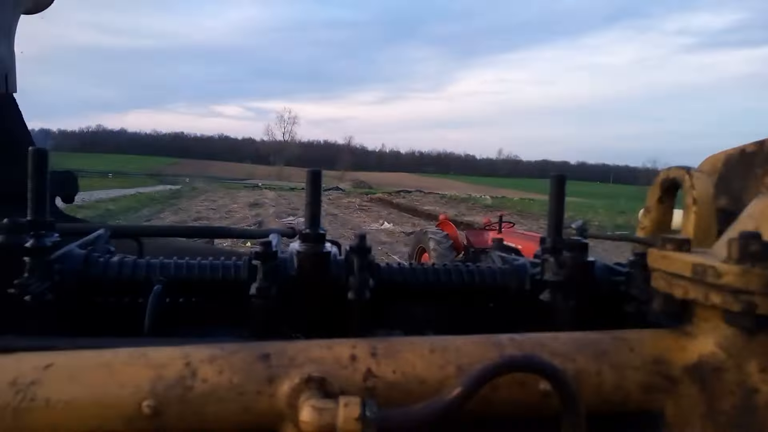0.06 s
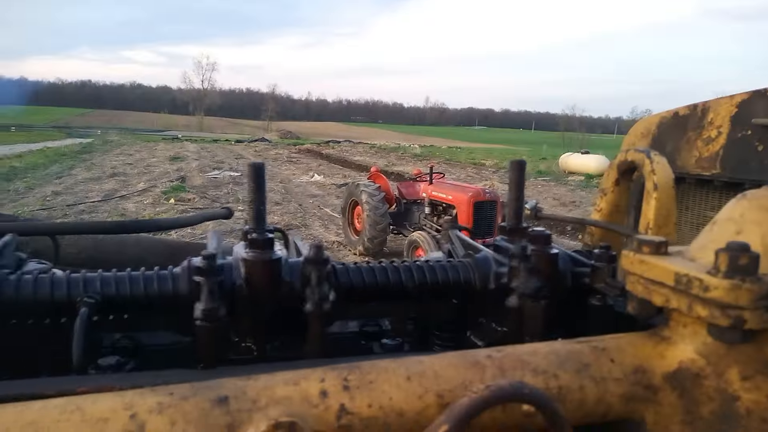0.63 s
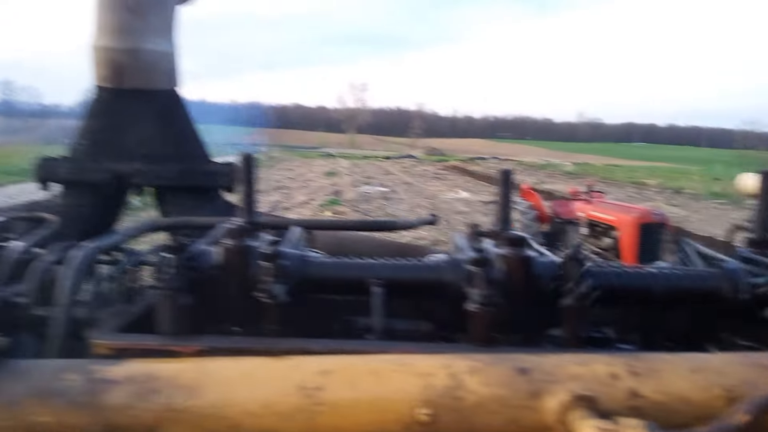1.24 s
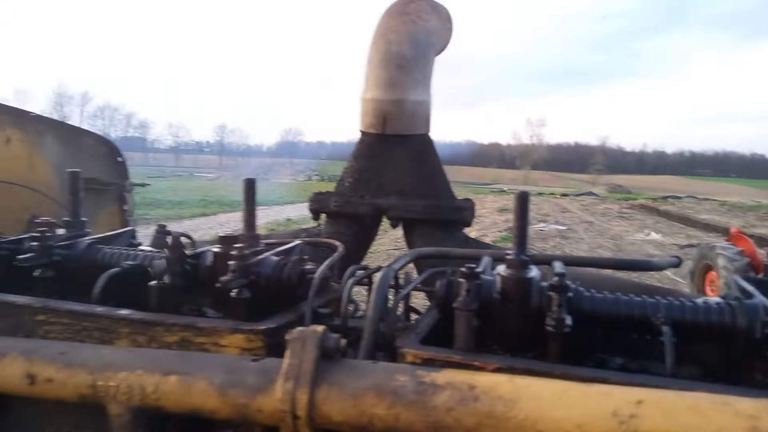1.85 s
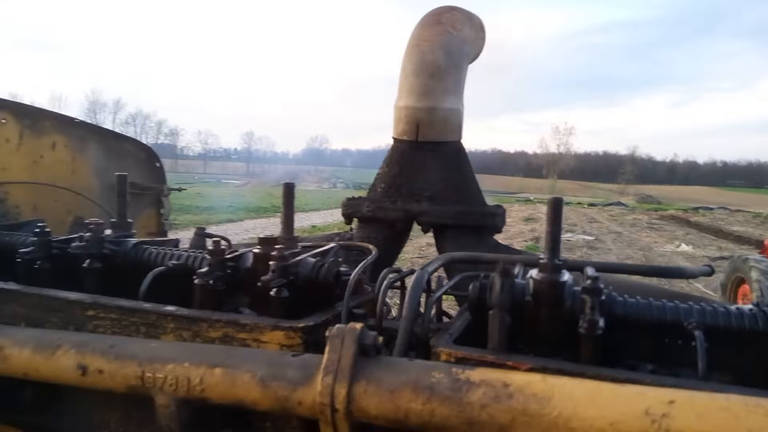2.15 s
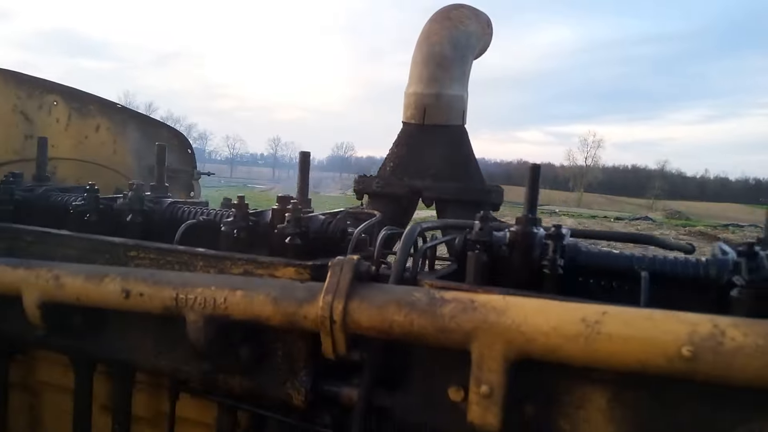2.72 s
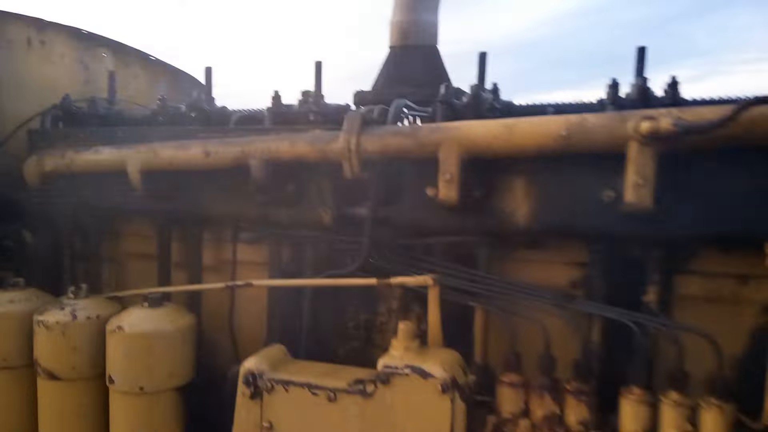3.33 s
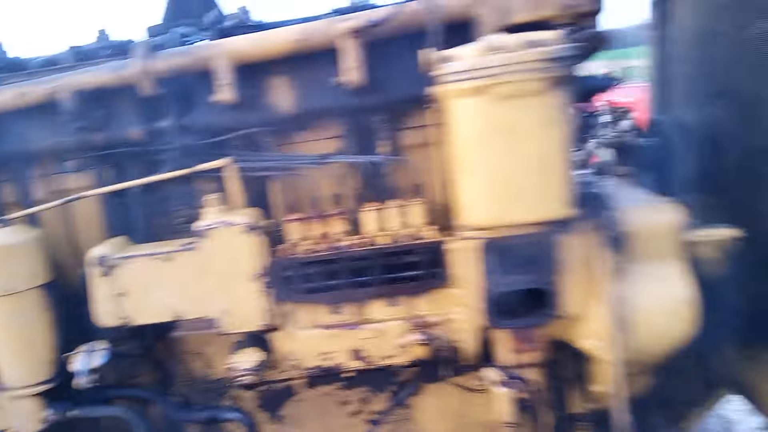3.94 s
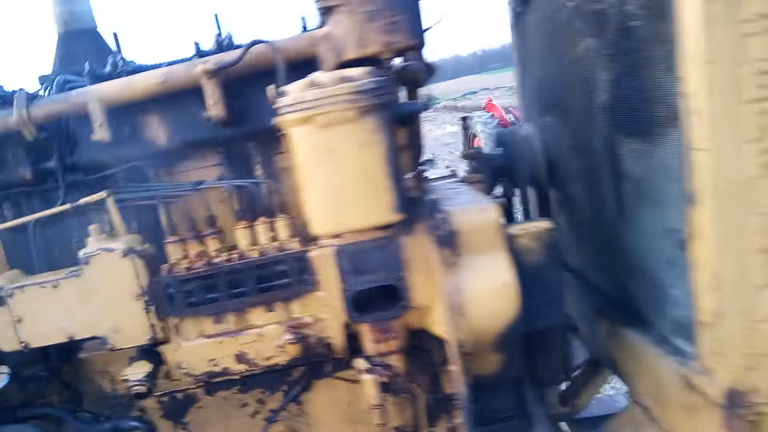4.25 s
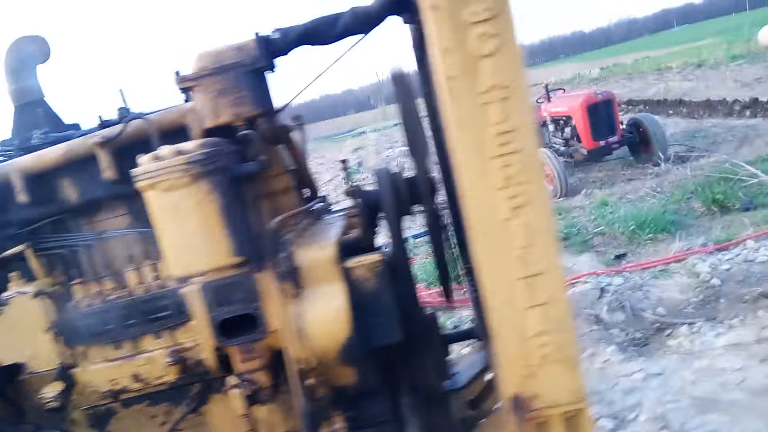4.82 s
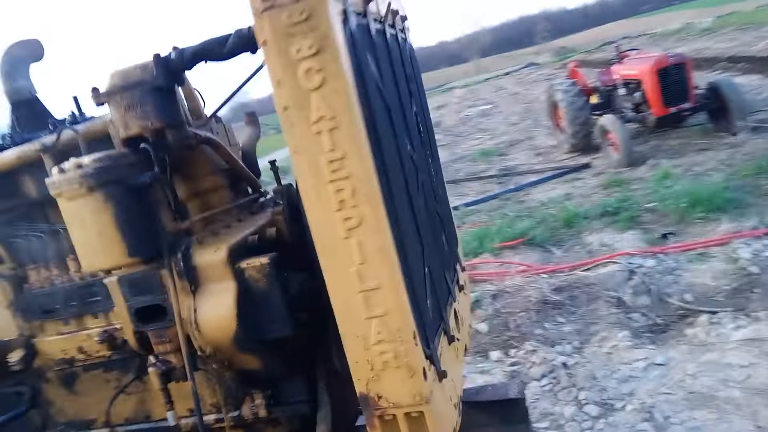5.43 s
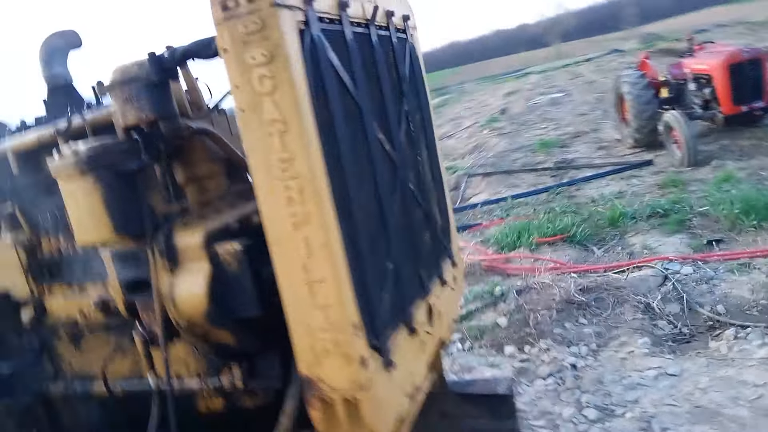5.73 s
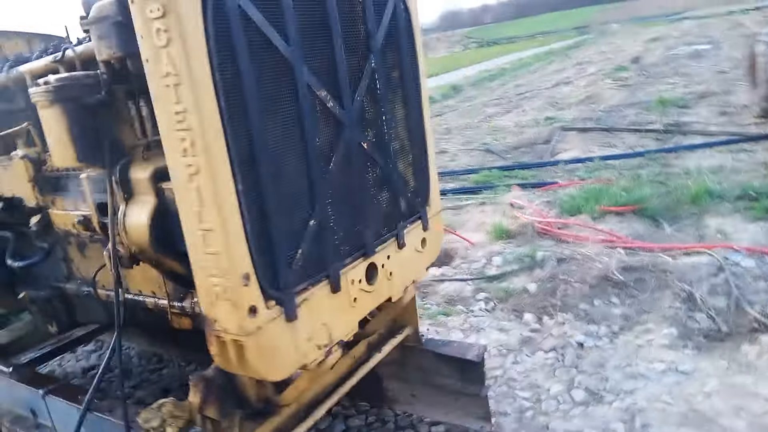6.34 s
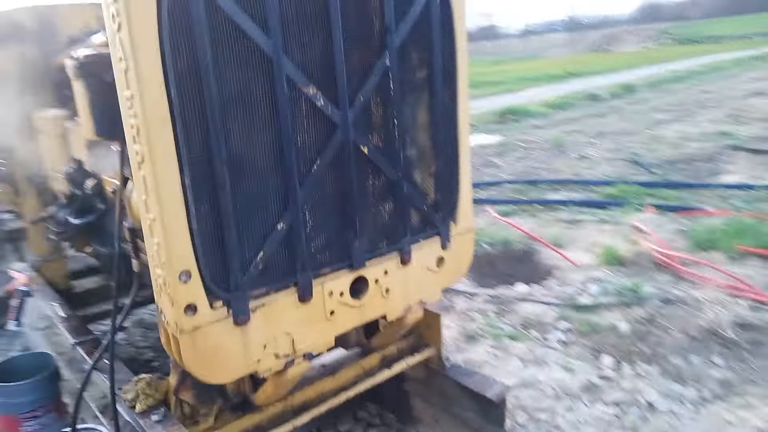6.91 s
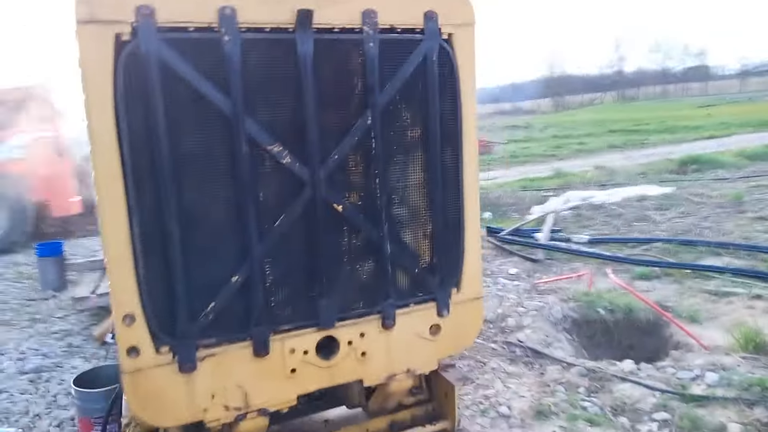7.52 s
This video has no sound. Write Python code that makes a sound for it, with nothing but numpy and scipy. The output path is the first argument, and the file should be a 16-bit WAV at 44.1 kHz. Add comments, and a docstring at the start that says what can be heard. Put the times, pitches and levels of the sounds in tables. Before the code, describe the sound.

A big old diesel engine idles outdoors for nearly eight seconds, the microphone starting close to its cylinder head. Sharp, slightly whistling chuffs of gas come five times a second, with two softer puffs between each. Underneath run rapid knocks, hollow metal ringing, whirring gears, clinking valves and low intake gulps, the last two clearest in the first two seconds. Longer, harsh barks break in around 0.2, 1, 1.8, 2.2 and 4.8 seconds, with weaker ones near 6.6 and 7.4. Scattered metallic clanks and hollow clonks punctuate the rhythm. Short gusts buffet the microphone just after 2 seconds, near 3, and between 5.5 and 6. From about 3 to 4.5 seconds the microphone passes a lightly rattling fuel pump. From 5 seconds it reaches the radiator: the engine keeps its pace but sounds quieter, the chuffs gain a thin high hiss, and a faint, low fan rush comes up.

```python
"""Sharp chuffs of gas, five a second, from a big old diesel outdoors, the microphone close to its head.
Each turn brings one sharp chuff, two softer ones, a low intake gulp and six knocks; now and then comes
a longer, harsh bark. Gears whirr, valve gear clinks and a few gusts buffet the microphone. We walk past
the rattling injection pump to the radiator, where the engine is quieter and the fan's rush comes up."""
import sys
import numpy as np
from scipy import signal
from scipy.fft import rfft, irfft, next_fast_len
from scipy.io import wavfile
from scipy.ndimage import uniform_filter1d, map_coordinates

SR = 44100
rng = np.random.default_rng(int(sys.argv[2]) if len(sys.argv) > 2 else 0)


def digitize_waveform(pressure):
    """Quantize a signal to 16-bit integers and store it at the path in sys.argv[1].

    Rows of a 2-D input are taken as channels; values are limited to [-1, 1].
    """
    field = np.atleast_2d(pressure).T
    bounded = np.clip(field, -1, 1)
    quanta = np.round(bounded * 32767).astype(np.int16)
    wavfile.write(sys.argv[1], SR, quanta)


N = 338247
TIME = np.arange(N) / SR


def amp(db):
    """Decibels to gain."""
    return 10 ** (np.asarray(db) / 20)


def unit(x):
    """Scale to rms 1."""
    return x / np.sqrt(np.mean(x ** 2) + 1e-20)


def loudness(x, size):
    """Running rms over size samples."""
    return np.sqrt(abs(uniform_filter1d(x ** 2, size)) + 1e-14)


def along(table, times, column=1):
    """One column of a (time [s], ...) table at these times."""
    columns = np.transpose(table)
    return np.interp(times, columns[0], columns[column])


def between(start, end):
    """The samples from start to end, in seconds."""
    return slice(*np.searchsorted(TIME, [start, end]))


def scatter(times, spread_db):
    """A random level offset for each of these times."""
    return spread_db * rng.standard_normal(len(times))


def wobble(rate):
    """A smooth random curve with rate knots a second."""
    knots = rng.standard_normal(int(N * rate / SR) + 4)
    steps = np.arange(0, len(knots) - 1, 1 / 8)
    return np.interp(TIME * rate, steps, map_coordinates(knots, [steps]))


def turbulence(rough_db, rate):
    """White noise that sputters in brief random bursts."""
    return unit(rng.standard_normal(N) * amp(rough_db * wobble(rate)))


def filtered(x, response):
    """Filter x by a gain that depends on frequency."""
    size = next_fast_len(len(x) + 8192)
    return irfft(rfft(x, size) * response(np.fft.rfftfreq(size, 1 / SR)), size)[:len(x)]


def colour(x, points):
    """Shape x by (frequency [Hz], level [dB]) points on a log axis; rms 1."""
    freqs, db = np.transpose(points)
    return unit(filtered(x, lambda hz: amp(np.interp(np.log(hz + 1), np.log(freqs), db))))


def resonate(x, modes):
    """Pass x through (frequency [Hz], width [Hz], level [dB]) resonances; rms 1."""
    def response(f):
        return sum(amp(db) * 1j * f * width / (hz * hz - f * f + 1j * f * width)
                   for hz, width, db in modes)
    return unit(filtered(x, response))


def swell(t, rise, fall):
    """A rounded peak at t = 0 with exponential flanks; rise and fall in seconds."""
    return np.exp(1 - np.sqrt(1 + (t / np.where(t < 0, rise, fall)) ** 2))


def puffs(times, levels_db, rise, fall):
    """The envelope of a row of puffs."""
    out = np.zeros(N)
    for s, db in zip(times, levels_db):
        near = between(s - .1, s + .15)
        out[near] += amp(db) * swell(TIME[near] - s, rise, fall)
    return out


# The engine's slightly drifting idle: (time [s], speed [turns/s])
IDLE_SPEED = [(0, 4.942), (1.5, 4.991), (2.7, 5.093), (3.7, 5.077), (4.8, 4.982), (5.5, 4.996),
              (6.3, 4.888), (7.2, 4.866), (7.67, 4.998)]
FIRST_CHUFF_S = .047

def moments(share):
    """The time at which each turn has gone through this share of its round."""
    clock = np.arange(0, N / SR + .5, .001)
    turns = np.cumsum(along(IDLE_SPEED, clock)) * clock[1]
    turns -= np.interp(FIRST_CHUFF_S, clock, turns)
    return np.interp(np.arange(np.interp(N / SR, clock, turns)) + share, turns, clock)


def castings(x, echo, spread_s):
    """Short reflections between the castings comb the sound, differently at each place on the walk."""
    places, spacing = np.linspace(0, N / SR, num=20, retstep=True)
    out = np.zeros(N)
    for place in places:
        near = np.flatnonzero(abs(TIME - place) < spacing)
        delays, gains = rng.uniform(.0004, spread_s, size=6), rng.normal(0, echo, size=6)
        echoes = sum(gain * x[near - int(delay * SR)] for delay, gain in zip(delays, gains))
        crossfade = np.sqrt(1 - abs(TIME[near] - place) / spacing)
        out[near] += unit(x[near] + echoes) * crossfade
    return unit(out)


# Air through the radiator: (frequency [Hz], level [dB])
FAN_SPECTRUM = [(20, -18), (55, -8), (110, -5.5), (190, 3), (280, 1.5), (450, -14), (1500, -44)]
# The fan comes up as the microphone nears it: (time [s], level [dB])
FAN_APPROACH = [(3, -64.5), (5, -55.5), (7, -55.5)]

def fan():
    """The cooling fan pushes a low, uneven rush of air through the radiator."""
    level_db = along(FAN_APPROACH, TIME) + 1.75 * wobble(9)
    return amp(level_db) * colour(rng.standard_normal(N), FAN_SPECTRUM)


# Wind right on the microphone: (time [s], length [s], buffet [dB], rumble [dB])
MIC_GUSTS = [(0.77, 0.042, -36.5, -45), (2.069, 0.096, -25.5, -72), (2.14, 0.11, -44, -57),
             (2.234, 0.089, -29, -48), (2.985, 0.13, -36, -61), (5.455, 0.076, -39.5, -54),
             (5.582, 0.14, -40.5, -44.5), (5.74, 0.073, -41, -54), (5.826, 0.053, -39, -37.5),
             (5.96, 0.18, -42.5, -44.5)]
# Its buffet and its deep rumble: (frequency [Hz], level [dB])
BUFFET_SPECTRUM = [(20, -36), (60, -3), (140, 5.5), (220, -2), (350, -8), (800, -74)]
RUMBLE_SPECTRUM = [(15, -6), (40, 0), (60, 7), (85, 30), (160, -47)]

def wind():
    """Brief gusts buffet the microphone, some with a deep rumble."""
    buffet = colour(rng.standard_normal(N), BUFFET_SPECTRUM)
    rumble = colour(rng.standard_normal(N), RUMBLE_SPECTRUM)
    buffet /= loudness(buffet, size=2200)
    rumble /= loudness(rumble, size=4400)
    return sum((amp(db) * buffet + amp(deep_db) * rumble) * np.exp(-(2 * (TIME - s) / length) ** 2)
               for s, length, db, deep_db in MIC_GUSTS)


# The pump's housing: (frequency [Hz], width [Hz], level [dB])
PUMP_MODES = [(916, 41, 1.5), (960, 65, 6.5), (1060, 110, -13)]

def injection_pump():
    """The pump rattles three times a turn, loudest as the microphone passes it halfway along."""
    passing_db = np.interp(TIME, [0, 2.3, 3.2, 4.2, 4.8, 7.6], [-82, -53, -47.5, -45.5, -63, -53.5])
    plungers = sum(puffs(moments(k / 3), scatter(moments(0), spread_db=3), rise=.006, fall=.012)
                   for k in range(3))
    rattle = turbulence(rough_db=3.5, rate=220) * plungers
    rattle = colour(rattle, [(400, -18), (800, -4), (1100, 2), (2000, -26)])
    return amp(passing_db) * resonate(rattle, PUMP_MODES)


# Relative levels from head to radiator: (time [s], knocks [dB], hollow ring [dB], gears [dB], air [dB])
MACHINERY_WALK = [(0, -45.5, -42.5, -39.5, -55), (.9, -43.5, -42, -38.5, -56), (2.4, -44, -48, -37, -56),
                  (3.5, -45.5, -42, -39.5, -61), (4.5, -49, -48.5, -43, -67), (5.8, -51, -58.5, -48, -70),
                  (7.2, -53, -55, -48, -85), (7.67, -55, -44, -49, -85)]
# The gears' whirr and the hiss of air: (frequency [Hz], level [dB])
GEAR_SPECTRUM = [(500, -20.5), (1000, -12), (1180, -8.5), (1340, 4), (1480, 3.5), (1630, -4.5), (1880, -9),
                 (2050, -17), (2180, -17), (2450, -19), (5000, -23.5), (8000, -46.5)]
AIR_SPECTRUM = [(2000, -29), (6000, 10.5), (8000, -2.5), (11000, 0), (13700, -5), (15000, 9), (15800, 4)]

def gears():
    """Gear teeth whirr under an uneven load, and twelve small ticks a turn ride on a hiss of air."""
    turns = moments(0)
    ticks = np.zeros(N)
    for k in range(12):
        times = moments(.03 + k / 12) + rng.normal(0, .002, len(turns))
        ticks += puffs(times, scatter(turns, spread_db=3), rise=.0005, fall=.002)
    load = amp(1.6 * wobble(22))
    teeth = turbulence(rough_db=1.5, rate=160) * load * (1 + ticks)
    whirr = castings(colour(teeth, GEAR_SPECTRUM), echo=.37, spread_s=.012)
    air = colour(rng.standard_normal(N) * (.2 + ticks), AIR_SPECTRUM)
    gear_db = along(MACHINERY_WALK, TIME, column=3) - .5
    air_db = along(MACHINERY_WALK, TIME, column=4) + .5
    return amp(gear_db) * whirr + amp(air_db) * air


# The shaken engine block: (frequency [Hz], level [dB])
BLOCK_SPECTRUM = [(35, -47), (70, -4.5), (120, -4), (240, -4.5), (350, 1), (440, -0.5), (520, -3),
                  (690, -2.5), (900, -4.5), (1100, -3.5), (1600, -15), (2400, -27), (5000, -82)]

def knocks():
    """Six knocks a turn shake the block, over a rough, continuous shudder."""
    turns = moments(0)
    blows = sum(puffs(moments(.055 + k / 6), scatter(turns, spread_db=2), rise=.001, fall=.006)
                for k in range(6))
    shaking = turbulence(rough_db=2.26, rate=250) * amp(1.83 * wobble(14)) * (blows + 1.55)
    return amp(along(MACHINERY_WALK, TIME) + 4) * colour(shaking, BLOCK_SPECTRUM)


# Blows on a hollow housing: (place in the turn [turns], level [dB])
HOUSING_BLOWS = [(.05, 1), (.21, 1), (.32, -0.5), (.39, -8.5), (.72, 2), (.88, 0.5)]
# Its resonances: (frequency [Hz], width [Hz], level [dB])
HOUSING_MODES = [(633, 27, -9.5), (685.6, 38, 8), (719, 29, 8)]

def hollow_ring():
    """The knocks make a hollow housing ring in uneven surges."""
    turns = moments(0)
    blows = sum(puffs(moments(share), db + scatter(turns, spread_db=5.5), rise=.0045, fall=.011)
                for share, db in HOUSING_BLOWS)
    drive = colour(rng.standard_normal(N), [(300, -32), (600, 1), (800, -1.5), (1400, -32)])
    ring = resonate(drive, HOUSING_MODES) * (blows + .24)  # it hums on between knocks
    return amp(along(MACHINERY_WALK, TIME, column=2) - 1.5) * unit(ring)


# Louder hollow clonks: (time [s], pitch [Hz], relative level [dB])
HEAVY_BLOWS = [(.305, 664, -37.5), (.626, 724, -37.5), (.9, 673, -34), (1.705, 670, -38.5),
               (4.433, 337, -40), (4.656, 323, -40.5), (5.037, 340, -40)]

def clonks():
    """Now and then a heavier blow rings a hollow part of the engine, with a rough, wavering tone."""
    out = np.zeros(N)
    waver = .8 * wobble(110)
    for s, hz, db in HEAVY_BLOWS:
        near = between(s - .03, s + .15)
        t = TIME[near] - s
        tone = np.sin(2 * np.pi * hz * t + waver[near])
        out[near] += amp(db + 5.5) * swell(t - .003, rise=.006, fall=.014) * tone
    return out


# The ring of rockers and push rods: (frequency [Hz], level [dB])
ROCKER_MODES = [(2250, -3), (3500, -3), (4300, -8.5), (5050, 2), (5900, -4), (8100, -19.5), (11500, -25)]

def valve_gear():
    """Rockers and push rods clink unevenly nine times a turn, plain only close to the cylinder head."""
    out = np.zeros(N)
    times = np.concatenate([moments(k / 9) for k in range(9)])
    for s in times + rng.normal(0, .005, len(times)):
        near = between(s, s + .04)
        t = TIME[near] - s
        close_db = np.interp(s, [0, 1.2, 2.2, 4, 6], [-36.5, -42, -44.5, -63.5, -63])
        chance = rng.standard_normal((len(ROCKER_MODES), 2))  # each blow has its own mix and tuning
        ring = sum(amp(db + 3.5 * loud) * np.sin(2 * np.pi * hz * (1 + .03 * shift) * t)
                   for (hz, db), (loud, shift) in zip(ROCKER_MODES, chance))
        out[near] += amp(close_db) * (1 - np.exp(-t / .001)) * np.exp(-t / .005) * ring
    return out


# Sharp metallic clanks, and the ringing cracks that open some barks:
# (time [s], pitch [Hz], relative level [dB])
CLANKS_AND_CRACKS = [(.161, 1880, -52), (0.206, 1960, -24.5), (1.012, 1860, -24), (1.565, 1470, -36),
                     (2.21, 1890, -29), (2.357, 1415, -30), (2.754, 1400, -36), (3.279, 1355, -26),
                     (3.67, 1420, -36), (4.779, 4730, -28), (7.246, 1350, -32)]

def clanks_and_cracks():
    """Each clank or crack is a short ring with a spray of noise."""
    spray = colour(rng.standard_normal(N),
                   [(400, -7), (1500, 10), (5500, -18), (8000, -23), (15000, -26)])
    out = np.zeros(N)
    for s, hz, db in CLANKS_AND_CRACKS:
        near = between(s, s + .06)
        t = TIME[near] - s
        ring = np.sin(2 * np.pi * hz * t) + .5 * np.sin(2 * np.pi * .99 * hz * t)
        envelope = (1 - np.exp(-t / .00053)) * np.exp(-t / .0053)
        out[near] += amp(db + 2) * envelope * (ring + .5 * spray[near])
    return out


# The intake pipe's air column: (frequency [Hz], width [Hz], level [dB])
INTAKE_MODES = [(90.3, 6.4, 18), (157, 12, 3.5), (210, 12, -7)]

def gulps(gulp_db):
    """Between main chuffs a draught of air booms in the intake pipe."""
    draught = colour(rng.standard_normal(N), [(25, -11), (75, 17), (220, -15.5), (500, -17)])
    boom = resonate(draught, INTAKE_MODES)
    # the air column is driven hard, so its strength varies less than that of free noise
    boom = unit(boom / (loudness(boom, size=1300) + .11))
    return boom * puffs(moments(.48), gulp_db + 3, rise=.015, fall=.038)


# Thin rings: (place in the turn [turns], frequency [Hz], width [Hz], relative level [dB])
THIN_RINGS = [(.08, 6000, 200, -14.5), (.36, 6000, 150, -25), (.66, 3120, 120, -19),
              (.98, 3000, 200, -10.5)]
# They are plainest from the front: (time [s], gain [dB])
THIN_RING_WALK = [(0, -7.5), (4.5, -11.5), (6.8, -4)]

def singing(times, main_db):
    """Thin metallic rings linger after the chuffs, following the main chuff's level."""
    walk_db = main_db + along(THIN_RING_WALK, times)
    out = np.zeros(N)
    for share, hz, width, db in THIN_RINGS:
        ring = resonate(rng.standard_normal(N), [(hz, width, 0)])
        ring_db = walk_db + db + scatter(times, spread_db=4.5)
        out += ring * puffs(moments(share), ring_db, rise=.0043, fall=.012)
    return out


# The top of the jet's hiss: (frequency [Hz], level [dB])
SIZZLE_SPECTRUM = [(4000, -20), (6500, 6), (7600, 5), (9000, -10), (11000, -7), (11600, 1), (12500, -8),
                   (13700, -17), (15200, 6)]
# That hiss at the microphone, against its chuff: (time [s], level [dB]) and (time [s], delay [s])
SIZZLE_WALK = [(1, -22), (3, -37), (5, -18), (6.9, -9)]
SIZZLE_LAG = [(4, 0.0016), (7, 0.006)]

def sizzle(times, main_db):
    """The highest hiss of each jet is beamed forward, so it stands out in front of the radiator."""
    hiss = colour(turbulence(rough_db=2.5, rate=500), SIZZLE_SPECTRUM)
    arrivals = times + along(SIZZLE_LAG, times)
    return hiss * puffs(arrivals, main_db + along(SIZZLE_WALK, times), rise=.0057, fall=.0036)


# The pipework's resonances: (frequency [Hz], width [Hz], level [dB])
PIPE_MODES = [(1690, 82, -17), (1889, 155, 6.5), (2212, 114, 5.5), (2640, 57, -28.5)]

def pipe_ring(times, soft_db):
    """Every chuff sets the pipework ringing, most clearly beside the cylinder head."""
    ring_db = soft_db + np.interp(times, [1, 2, 5, 7], [-1.9, -5, -.86, -8])
    blows = sum(puffs(moments(share), ring_db + db + scatter(times, spread_db=4.5), rise=.014, fall=.0074)
                for share, db in [(0, 2.6), (.33, 2), (.67, .5)])
    drive = colour(rng.standard_normal(N), [(900, -20), (1700, 13.5), (2800, -14), (4500, -17)])
    ring = resonate(drive, PIPE_MODES)
    return blows * unit(ring / (loudness(ring, size=1300) + .26))


# Harsh barks of gas: (time [s], length [s], blast [dB], pipe ring [dB])
BARK_BLASTS = [(0.192, 0.075, -33.5, -35.5), (1.002, 0.062, -33.5, -43), (1.806, 0.054, -26.5, -65),
               (2.201, 0.065, -31.5, -30.5), (4.774, 0.05, -34.5, -43), (6.001, 0.051, -42, -49),
               (6.59, 0.055, -35, -45), (7.406, 0.061, -36, -72)]
# The blast: (frequency [Hz], level [dB])
BARK_SPECTRUM = [(300, 1), (1200, -2), (1900, 2.5), (2900, 1.5), (4000, -1), (5000, 5.5), (6400, -10),
                 (7500, -12.5), (9000, -27.5), (15300, -27)]

def barks():
    """A sputtering blast, held for some hundredths of a second, rings the pipework."""
    sputter = colour(turbulence(rough_db=2.5, rate=320), BARK_SPECTRUM)
    blast = castings(sputter, echo=1, spread_s=.01)
    ring = resonate(blast, PIPE_MODES)
    out = np.zeros(N)
    for s, length, db, ring_db in BARK_BLASTS:
        near = between(s, s + .2)
        t = TIME[near] - s
        held = (1 - np.exp(-t / .0052)) / (1 + np.exp((t - length) / .007))
        out[near] += held * (amp(db) * blast[near] + amp(ring_db) * ring[near])
    return out


# The softer jets: (frequency [Hz], level [dB])
SOFT_CHUFF_SPECTRUM = [(900, -28), (2000, -11), (2600, 6.5), (3300, 4.5), (5000, 5), (6300, -1.5),
                       (7300, -11), (9000, -14), (13500, -24), (15300, -8)]

def soft_chuffs(soft_db):
    """The other cylinders blow more softly, a third and two thirds of a turn after the main chuff."""
    out = np.zeros(N)
    for share, db in [(.32, -1.5), (.655, -3.5)]:
        sputter = colour(turbulence(rough_db=5.5, rate=620), SOFT_CHUFF_SPECTRUM)
        jet = castings(sputter, echo=.99, spread_s=.006)
        out += jet * puffs(moments(share), soft_db + db, rise=.0062, fall=.0061)
    return out


# The iron head and manifold: (frequency [Hz], level [dB])
IRON_MODES = [(2003, -13), (2116, 3), (2476, 4), (2745, 9), (2945, -1), (3214, 6), (3515, -4.5), (3704, -2),
              (3849, -9), (3994, 8.5), (4436, 4), (4630, 6), (4910, -3.5), (5044, -8), (5313, -32),
              (5599, 5.5), (5879, -1.5), (6067, 0.5), (6331, 4), (6632, -3), (6788, -36), (7079, -38)]

def iron(jets, width_hz, wander_db):
    """The jets ring the iron; each mode comes and goes as the microphone moves. The level is kept."""
    ring = np.zeros(N)
    for hz, db in IRON_MODES:
        mode = signal.lfilter(*signal.iirpeak(hz, hz / width_hz, SR), jets)
        ring += amp(db + wander_db * np.tanh(wobble(4))) * mode
    ring *= loudness(jets, size=8820) / loudness(ring, size=8820)
    both = ring + jets
    return both * np.std(jets) / np.std(both)


def facing(jets):
    """Over the head the jets sound hollow near 2.7 kHz; from the front they fill out and lose edge."""
    body = filtered(jets, lambda hz: np.exp(-((hz - 2700) / 520) ** 2))
    edge = filtered(jets, lambda hz: np.exp(-((hz - 4500) / 900) ** 2))
    body_db = np.interp(TIME, [0, 3, 5, 7], [-6, -7.5, 0, -3])
    edge_db = np.interp(TIME, [4, 7], [-.3, -3.5])
    return jets + body * (amp(body_db) - 1) + edge * (amp(edge_db) - 1)


# Relative levels from head to radiator: (time [s], main chuff [dB], soft chuffs [dB], gulp [dB])
GAS_WALK = [(0, -26, -34, -41), (.85, -26, -34.5, -36.5), (1.9, -31, -38.5, -39.5),
            (2.5, -25.5, -34, -48.5), (3.4, -25.5, -39, -51.5), (4.3, -29, -44, -69),
            (6.2, -34, -49, -60.5), (6.9, -33.5, -49.5, -62), (7.67, -31.5, -42.5, -67)]
BARK_REACH_S, BARK_ROBS_DB = .1, 17.5  # a bark takes the gas from a main chuff within its reach

def strokes():
    """Each turn's time and the levels of its main chuff, soft chuffs and gulp."""
    times = moments(0)
    bark_times = np.array(BARK_BLASTS)[:, 0]
    barking = np.any(abs(times[:, None] - bark_times) < BARK_REACH_S, axis=1)
    main_db = along(GAS_WALK, times, column=1) + scatter(times, spread_db=2.66) - BARK_ROBS_DB * barking
    soft_db = along(GAS_WALK, times, column=2) + scatter(times, spread_db=1)
    gulp_db = along(GAS_WALK, times, column=3) + scatter(times, spread_db=3.8)
    return times, main_db, soft_db, gulp_db


# The main jet: (frequency [Hz], level [dB])
CHUFF_SPECTRUM = [(500, -34), (1300, 7), (2200, 1), (2700, -2.5), (3300, 4.5), (4600, 1), (6200, -3.5),
                  (7200, -10.5), (8500, -22.5), (13500, -25), (15300, -23)]
# Its tail, longer toward the radiator: (time [s], fall time [s])
CHUFF_TAIL = [(3.5, .005), (7, 0.0081)]
# Its strongest resonance, lower toward the radiator: (time [s], pitch [Hz])
WHISTLE_PITCH = [(0, 4410), (3.5, 4074), (5.5, 3680), (7, 3180)]
WHISTLE_SCATTER, WHISTLE_WIDTH_HZ, WHISTLE_DB = .151, 61, -4  # scatter as a share of the pitch

def main_chuffs(times, levels_db):
    """Once a turn gas jets out, whistling, through a valve that opens and closes smoothly."""
    sputter = colour(turbulence(rough_db=-1.5, rate=1100), CHUFF_SPECTRUM)
    jet = castings(sputter, echo=1, spread_s=.006)
    pitches = along(WHISTLE_PITCH, times) * np.exp(WHISTLE_SCATTER * rng.standard_normal(len(times)))
    out = np.zeros(N)
    for s, db, hz in zip(times, levels_db, pitches):
        near = between(s - .08, s + .12)
        t = TIME[near] - s
        whistle = resonate(rng.standard_normal(len(t)), [(hz, WHISTLE_WIDTH_HZ, 0)])
        envelope = swell(t, rise=.0059, fall=along(CHUFF_TAIL, s))
        out[near] += amp(db) * envelope * (jet[near] + amp(WHISTLE_DB) * whistle)
    return out


def scene():
    """The engine in the open air, on one microphone carried from cylinder head to radiator."""
    times, main_db, soft_db, gulp_db = strokes()
    jets = main_chuffs(times, main_db) + soft_chuffs(soft_db) + barks()
    gas = facing(iron(jets, width_hz=48, wander_db=12)) + sizzle(times, main_db)
    gas += pipe_ring(times, soft_db) + singing(times, main_db) + gulps(gulp_db)
    metal = knocks() + hollow_ring() + gears() + injection_pump() + valve_gear()
    return (gas + metal + clanks_and_cracks() + clonks() + fan() + wind())[None]


TOP_HZ = 15850

def record(dry):
    """The recorder keeps nothing above its band limit."""
    return np.array([filtered(channel, lambda hz: hz < TOP_HZ) for channel in dry])


dry = scene()
out = record(dry)
digitize_waveform(out)
```